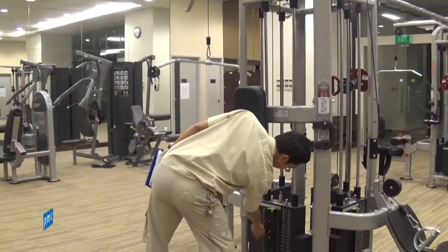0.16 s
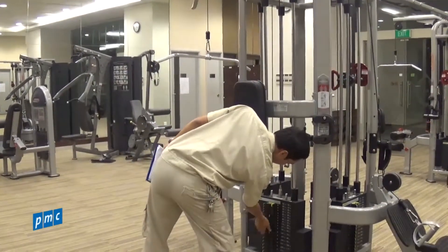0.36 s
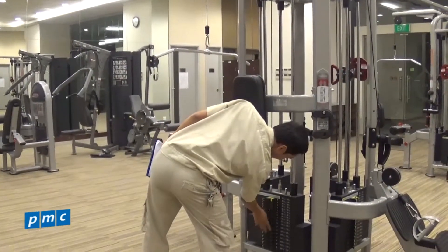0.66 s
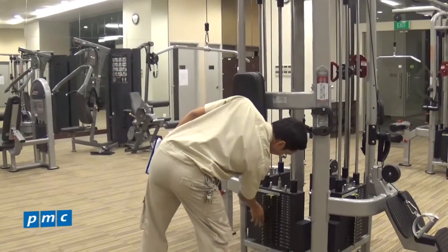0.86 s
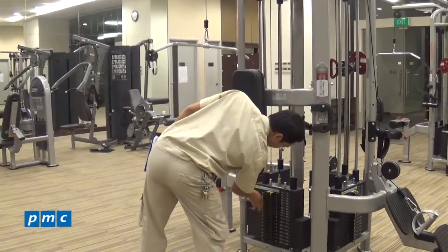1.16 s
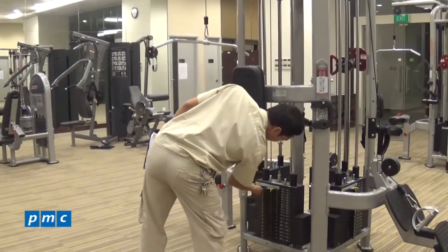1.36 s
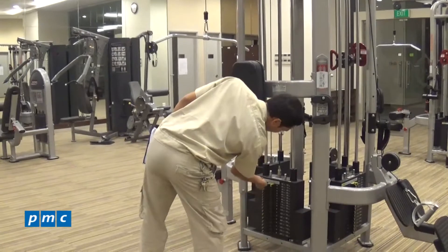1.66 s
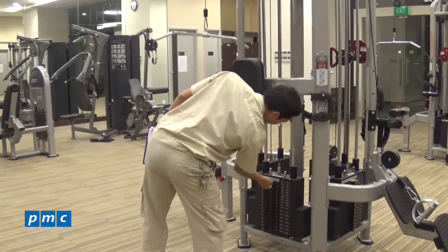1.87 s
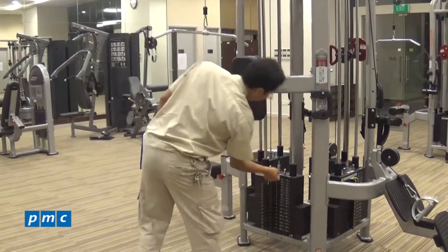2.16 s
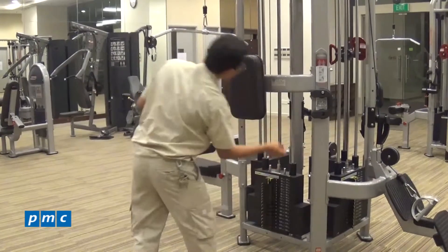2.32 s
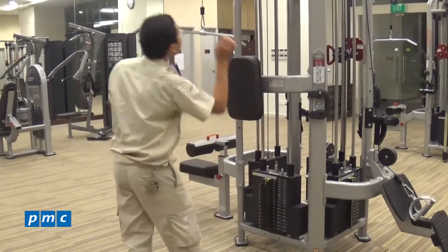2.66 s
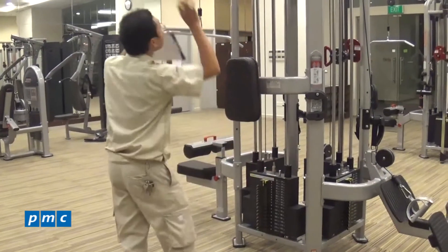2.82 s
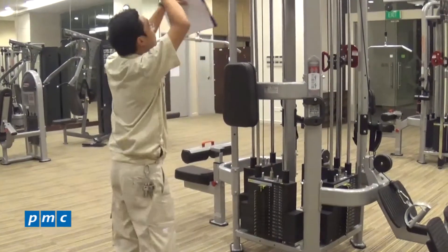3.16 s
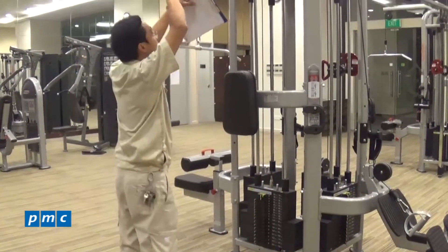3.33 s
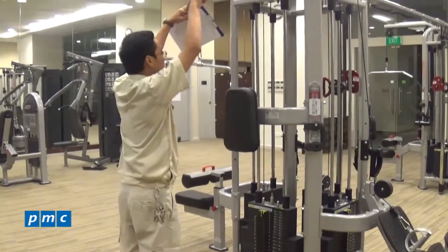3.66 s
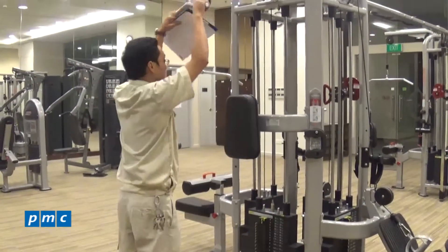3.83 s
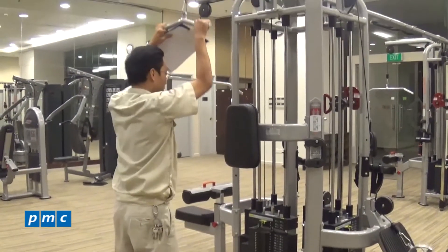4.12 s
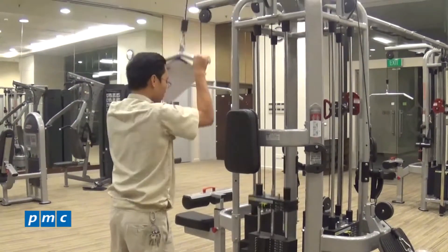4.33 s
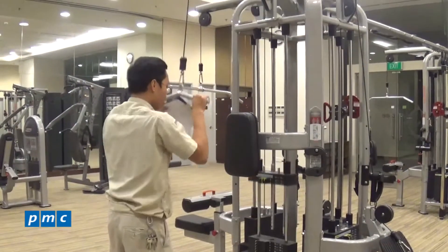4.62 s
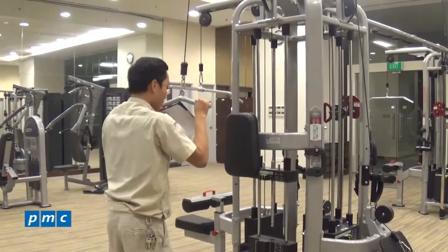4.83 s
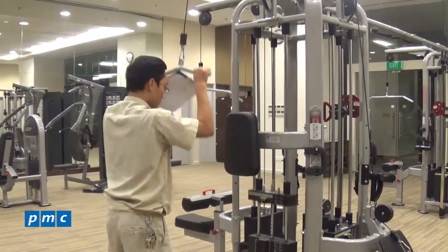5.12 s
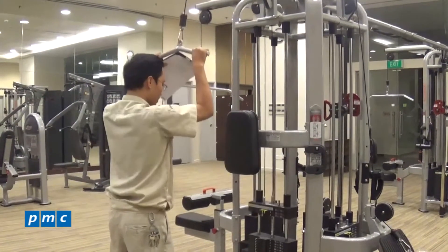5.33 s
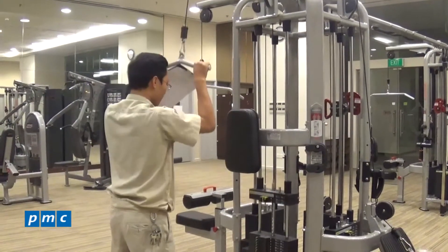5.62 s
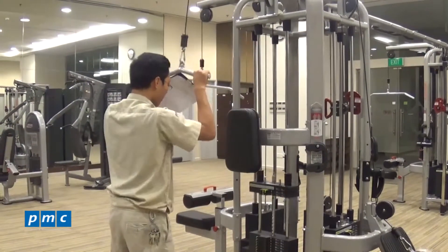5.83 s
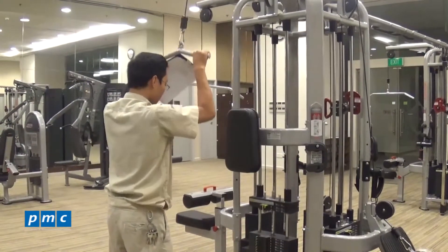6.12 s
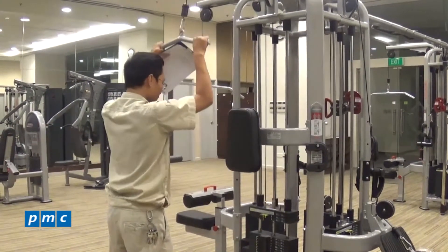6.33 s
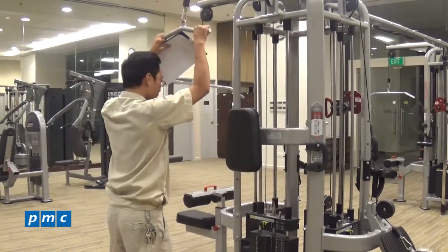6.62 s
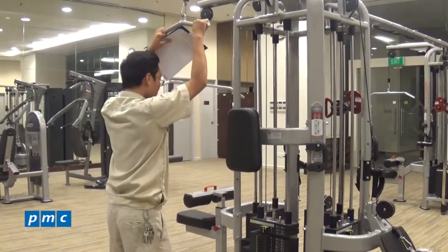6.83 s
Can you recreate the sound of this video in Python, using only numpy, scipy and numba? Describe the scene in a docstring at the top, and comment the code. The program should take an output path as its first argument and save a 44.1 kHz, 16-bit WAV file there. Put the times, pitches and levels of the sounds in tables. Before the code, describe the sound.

A steel pin is worked out of a gym weight stack and pushed back in, a few metres from the microphone. Sharp clanks with short, chattering rattles come at about 0.1, 0.5, 0.8 and 1.2 seconds, with a last firm cluster at 1.8, each echoing through a hard hall. Around 2.7 seconds a finger rubs briefly on the camera, followed by a few small, dry clicks right at the microphone until 3.4. At about 3.9 seconds the cable snatches the stack up: a quick metallic jolt, a bright ring from the stem and rods, and a soft, low frame rumble that fades by about 5 seconds. Ventilation and a faint mains hum fill the room throughout, sinking slightly after 3 seconds, along with a very faint, even ticking. A few tiny handling clicks occur between 5.8 and 6.6 seconds, before the end near 7.

```python
"""A steel selector pin is worked out of a gym weight stack and pushed home, a few metres from the
microphone of a hand-held camera. The plates clank and chatter into a hard, echoing hall; later the cable
snatches the stack up, its stem rings and the frame rumbles. Right at the microphone the camera rubs and
clicks under the fingers and ticks faintly. Ventilation and mains hum fill the room behind."""
import sys
import numpy as np
from scipy import signal
from scipy.fft import rfft, irfft, next_fast_len
from scipy.io import wavfile
from scipy.ndimage import uniform_filter1d, minimum_filter1d
from numba import njit

SR = 44100
rng = np.random.default_rng(int(sys.argv[2]) if len(sys.argv) > 2 else 0)


def wrap_up_sound(samples):
    """Save the sound to the file named by the first command line argument, as 16-bit audio."""
    columns = np.atleast_2d(samples).T
    # keep every value between -1 and 1, then stretch to whole-number steps
    tamed = np.clip(columns, -1, 1)
    steps = np.round(tamed * 32767).astype(np.int16)
    wavfile.write(sys.argv[1], SR, steps)


N = 307785
TIME = np.arange(N) / SR

# Moves of the pin; its seat in the hole favours one range of the plate's modes: (time [s], favoured
# pitch [Hz], width [octaves], lift [dB], tip ring [dB], relative chatter level [dB], swell [s],
# fade [s], tilt [dB/octave])
PIN_MOVES = [(0, 2100, 0.09, 10, 1.5, -27.5, 0.0033, .045, -3),
             (.138, 2056, 0.16, 17.5, -0.5, -8, 0.018, 0.09, 3),
             (.526, 2100, 0.11, 9.5, 2.5, -20, 0.033, 0.15, 1),
             (.844, 2710, 0.48, 6.5, 0.5, -3.5, 0.033, 0.066, 4),
             (1.2081, 1658, 0.54, 10, 2.5, -18, .015, 0.036, -3.5),
             (1.756, 1410, 0.45, 5, 9, -11.5, 0.027, 0.091, 1.5)]
# Pin on plate, brighter when it glances: (time [s], relative level [dB], tilt [dB/octave])
PIN_KNOCKS = [(.0394, -25.5, -5.5), (.075, -22.5, 1), (.1198, -16, 8.5), (.138, -4, 4), (.1506, -10.5, 9.5),
              (0.517, -17.5, -1), (.526, -4, 4.5), (.547, -6, 1.5), (.8, -22.5, 6.5), (0.83, -17.5, -0.5),
              (.8444, -4, 7), (.856, -13.5, 6), (1.167, -25, 8), (1.179, -7.5, 4.5), (1.192, -22, -1),
              (1.2081, -5.5, 3.5), (1.226, -16.5, 17), (1.6072, -26.5, 1), (1.7008, -34, 8),
              (1.7409, -21.5, 2.5), (1.7561, -3, 9.5), (1.764, -8.5, 4), (1.7689, -6.5, 6),
              (1.774, -7.5, -0.5), (1.787, -9.5, 7.5)]
# Modes of plate and pin: (frequency [Hz], relative level [dB], t60 [s])
PLATE_MODES = [(752, -11.5, 0.011), (1037, -22, 0.081), (1396, -9, .035), (1510, -17, 0.029),
               (1840, -20.5, 0.035), (1750, -14.5, 0.023), (1935, -8, 0.025), (2207, -3.5, 0.029),
               (2328, -3.5, .04), (2677, 1, 0.012), (2540, 7.5, 0.008), (2882, -3, 0.049), (3143, -4, 0.07),
               (3285, 2, 0.02), (3640, -1.5, 0.011), (3806, -4.5, 0.019), (4020, -4.5, 0.023),
               (4390, -2, 0.024), (4880, -8.5, .018), (5560, -6.5, 0.028), (6010, 1.5, 0.017),
               (6900, -2, 0.017), (7435, -3, 0.019), (8350, -5.5, 0.019), (8740, -2.5, 0.015),
               (9323, -8.5, 0.035), (9970, -2.5, 0.013)]
# Crack of pin on plate: (frequency [Hz], relative level [dB])
PLATE_CRACK = [(200, -13.5), (500, -15.5), (1100, 1.5), (2500, 8.5), (5000, 5), (9500, -4), (11000, -9)]
# The stem takes up the load: (time [s], relative level [dB])
STEM_JOLTS = [(3.865, -30), (3.878, -10.5), (3.8839, -12), (3.8918, -10.5), (3.9, -34)]
# Crack of stem on pin: (frequency [Hz], relative level [dB])
STEM_CRACK = [(200, -17.5), (500, -10), (700, -4.5), (900, -11), (1300, 3.5), (1600, -5), (1900, 7),
              (2400, -6), (3400, -2), (4200, 3), (4800, -14), (5800, -3.5), (6500, 9), (6950, -3.5),
              (8400, 6.5), (9300, -2.5), (9900, 8.5), (11000, -9.5)]
# Modes of stem and guide rods: (frequency [Hz], relative level [dB], t60 [s])
STEM_MODES = [(665, -15.5, 0.57), (1222, -17, 1), (1310, -4, 0.48), (1825, -15.5, 1), (1907, -1, 0.51),
              (2660, -15, 1), (2982, -10, 1), (3785, -8.5, 1), (4197, -7, 0.29), (6083, -19, 0.58),
              (6479, 11.5, 0.29), (7180, -14, .45), (7435, 2, 0.42), (7850, -13, 0.26), (8265, -4, .35),
              (8540, -9, 0.39), (9300, -2, .35), (10820, -11, 0.318)]
# Frame and pulleys as the stack rises: (frequency [Hz], relative level [dB])
FRAME_RUMBLE = [(15, -17), (27, 0), (60, -2), (140, -7), (200, 0.5), (350, -15.5), (700, -1), (1500, -4.5),
                (4000, -51)]
# First reflections off floor and frame: (delay [s], relative level [dB])
REFLECTIONS = [(.0035, -18.5), (0.0103, -17), (0.015, -21)]
# Decay of the hall: (frequency [Hz], t60 [s])
HALL_T60 = [(150, 4.4), (700, 1.4), (2000, 1.203), (4000, 1.11), (7000, 0.89), (11000, 0.55)]
# Colour of the hall's echo: (frequency [Hz], relative level [dB])
HALL_COLOUR = [(100, 3.5), (700, 10.5), (2500, 3), (5000, 4.5), (8000, 0.5), (11000, 0.5)]
# A finger slides on the camera body: (frequency [Hz], relative level [dB])
FINGER_RUB = [(600, -13), (1300, -3), (1900, 3.5), (3200, -7.5), (4400, -10), (6500, -8), (9500, -3.5),
              (11000, -9)]
# Casing clicks at the microphone: (time [s], relative level [dB], pitch [Hz], treble [dB])
CASING_CLICKS = [(2.7775, -30.5, 3550, -4.5), (3.0255, -38, 3100, -13), (3.203, -26.5, 3120, 3.5),
                 (3.427, -51, 8720, -2), (5.766, -50.5, 803, -42), (6.3025, -50.5, 3347, -6.5),
                 (6.5627, -51, 2600, -10.5)]
# Room tone of ventilation and hiss: (frequency [Hz], relative level [dB])
AIR_COLOUR = [(12, -52.5), (20, -21), (69, -18), (81, -7), (103, -8), (124, -12.5), (165, -16), (199, -10),
              (227, -17.5), (259, -15), (428, -17), (514, -17.5), (806, -18), (2030, -23), (11000, -30.5),
              (14300, -65), (22000, -120)]
# Stereo width of the room tone: (frequency [Hz], side minus mid [dB])
AIR_WIDTH = [(60, -19.5), (190, -8), (600, -0.5), (1100, 0.5), (3500, -3), (11000, -10)]
# Mains hum: (frequency [Hz], relative level [dB])
MAINS_HUM = [(100.3, -64), (200, -80.5)]
# The room tone sinks slowly: (time [s], gain [dB])
ROOM_TONE_GAIN = [(0, 6), (2.7, 6), (3.7, 2.8), (6.98, -0.2)]


def pin(bounces=54, mean_gap_s=.007, dulling_db_per_s=10.5, knock_lift_db=5):
    """The pin knocks and chatters along its hole, in uneven bounces that swell, then weaken and dull."""
    out = np.zeros(N)
    for start, hz, octaves, lift_db, tip_db, db, swell_s, fade_s, tilt_db in PIN_MOVES:
        delays = mean_gap_s * (np.arange(bounces) + rng.uniform(0, 1, bounces))
        force = (1 - np.exp(-(delays / swell_s) ** 2)) * np.exp(-delays / fade_s)
        for delay, gain in zip(delays, force * undb(db)):
            bounce = clank(hz, octaves, lift_db, tip_db, tilt_db - dulling_db_per_s * delay)
            add(out, start + delay, gain * bounce)
    for start, db, tilt_db in PIN_KNOCKS:
        # a square blow drives the nearest move's favoured modes harder than a bounce does
        _, hz, octaves, lift_db, tip_db, *_ = min(PIN_MOVES, key=lambda move: abs(move[0] - start))
        add(out, start, undb(db) * clank(hz, octaves, lift_db + knock_lift_db, tip_db, tilt_db))
    return thin(out)


def clank(seat_hz, octaves, lift_db, tip_db, tilt_db, detune=.017, vary_db=2, rise_s=.00027):
    """One steel contact: a crack and the plate's modes; the pin's seat decides which speak."""
    def favour_db(f):
        seat = lift_db * bump(f, seat_hz, octaves, steep=3.7)
        tip = tip_db * bump(f, hz=9350, octaves=.25)
        return seat + tip + tilt_db * np.log2(np.maximum(f, 500) / 3000)

    t = TIME[:3000]
    hz, db, t60 = np.transpose(PLATE_MODES)
    shift, luck = rng.standard_normal((2, len(hz)))
    modes = strike(ring(t, hz * (1 + detune * shift), db + favour_db(hz) + vary_db * luck, t60))
    crack = burst(lambda f: at(f, PLATE_CRACK) + favour_db(f), t60=.023)
    return strike((modes + crack) * (1 - np.exp(-t / rise_s)))


def jolts():
    """The stem jolts against the pin a few times as the cable tightens."""
    out = np.zeros(N)
    for start, db in STEM_JOLTS:
        add(out, start, undb(db) * burst(lambda f: at(f, STEM_CRACK), t60=.081, size=5000))
    return out


def stem(twin_db=-7, split_hz=(3.43, 18.9)):
    """The hardest jolt rings stem and rods; each bends two ways at nearly one pitch, so tones beat."""
    out, t = np.zeros((2, N)), TIME[:50000]
    hz, db, t60 = np.transpose(STEM_MODES)
    tones = ring(t, hz, db, t60)
    twins = [ring(t, hz + rng.uniform(*split_hz, len(hz)), db + twin_db, t60) for _ in range(2)]
    start, _ = max(STEM_JOLTS, key=lambda jolt: jolt[1])
    add(out, start, tones + np.array(twins))
    return out


def friction(colour, start, rise_s, hold_s, t60, db, side_db):
    """Sliding surfaces make noise of one colour that swells, holds and fades."""
    t = TIME - start
    envelope = np.clip(t / rise_s, 0, 1) * fade(np.maximum(t - rise_s - hold_s, 0), t60)
    mid, side = (unit(noise(N, lambda f: at(f, colour))) for _ in range(2))
    return stereo(mid, undb(side_db) * side) * undb(db) * envelope


def direct_path(x):
    """The straight path from stack to microphone, with the first reflections."""
    out = pan(db=-.7) * x
    for delay, db in REFLECTIONS:
        add(out, delay, undb(db) * x)
    return out


def hall(x, build_s=.0036, side_db=-7, size=65536):
    """The hard walls return a diffuse echo that builds up, then dies fastest in the treble."""
    t, f = TIME[:size], np.arange(size // 2 + 1) * SR / size
    centres = np.geomspace(100, 12000, 15)
    spectra = rfft(rng.standard_normal((2, size))) * undb(at(f, HALL_COLOUR))
    tail = 0
    for hz, share in zip(centres, np.eye(len(centres))):
        band = irfft(spectra * at(f, np.column_stack([centres, share])), size)
        tail = tail + band * fade(t, at(hz, HALL_T60))
    mid, side = tail * (1 - np.exp(-(t / build_s) ** 2))
    response = stereo(mid, undb(side_db) * side) / np.linalg.norm(mid)
    return signal.fftconvolve(x[None], response, axes=1)[:, :N]


def shifting_hall(x):
    """The man shifts beside the stack with each move, so each meets its own pattern of reflections."""
    times = [move[0] for move in PIN_MOVES]
    return sum(hall(x * np.sqrt(np.interp(TIME, times, share))) for share in np.eye(len(times)))


def camera_clicks(side_db=-9):
    """The casing clicks under the fingers, dry and right at the microphone."""
    out = np.zeros((2, N))
    for start, db, hz, treble_db in CASING_CLICKS:
        def casing_db(f):
            edge = bump(f, 8750, .25) + .5 * bump(f, 1200, .2)
            return 20 * np.log10(bump(f, hz, octaves=.57) + undb(treble_db) * edge + 1e-4)

        mid, side = (burst(casing_db, t60=.018) for _ in range(2))
        add(out, start, undb(db) * pan(db=-1) * thin(stereo(mid, undb(side_db) * side)))
    return out


def camera_ticks(per_second=12.47, db=-60):
    """The camera's works tick faintly and evenly, close and dead centre."""
    out = np.zeros(N)
    for start in np.arange(.06, TIME[-1], 1 / per_second):
        add(out, start, undb(db) * burst(lambda f: 40 * bump(f, hz=2600, octaves=.34), t60=.035))
    return out


def room_tone(air_db=-59, waver=.076):
    """Ventilation all round the microphone, widest in the middle range, and a wavering mains hum."""
    mid = noise(N, lambda f: at(f, AIR_COLOUR) - 9 * bump(f, hz=100, octaves=.2))
    side = noise(N, lambda f: at(f, AIR_COLOUR) + at(f, AIR_WIDTH))
    air = undb(air_db) * stereo(mid, side) / mid.std()
    drift = unit(noise(N, lambda f: -40 * np.log10(1 + (f / 3) ** 2)))
    hum = sum(undb(db) * np.sqrt(2) * np.sin(2 * np.pi * hz * TIME) for hz, db in MAINS_HUM)
    return (air + hum * (1 + waver * drift)) * undb(np.interp(TIME, *np.transpose(ROOM_TONE_GAIN)))


def undb(db):
    """Decibels to gain."""
    return 10 ** (np.asarray(db) / 20)


def unit(x):
    """Scale to rms 1."""
    return x / np.sqrt(np.mean(x ** 2))


def strike(x):
    """Scale a blow to rms 1 over its first 5 ms."""
    return x / np.sqrt(np.mean(x[:220] ** 2))


def at(hz, points):
    """Read a table on a log-frequency axis."""
    f, values = np.transpose(points)
    return np.interp(np.log(np.maximum(hz, 1)), np.log(f), values)


def bump(f, hz, octaves, steep=2):
    """A bell on the log-frequency axis, 1 at its centre; a higher steepness flattens its top."""
    return np.exp(-.5 * np.abs(np.log2(np.maximum(f, 1) / hz) / octaves) ** steep)


def noise(size, colour):
    """White noise filtered by colour(Hz) -> dB."""
    length = next_fast_len(size)
    spectrum = rfft(rng.standard_normal(length))
    return irfft(spectrum * undb(colour(np.arange(len(spectrum)) * SR / length)), length)[:size]


def fade(t, t60):
    """Exponential decay, 60 dB down after t60."""
    return np.exp(-np.log(1000) * t / t60)


def burst(colour, t60, size=3000):
    """The crack of a contact: coloured noise that dies away."""
    return strike(noise(size, colour) * fade(TIME[:size], t60))


def ring(t, hz, db, t60):
    """Sum of decaying modes, each at its own phase."""
    phase = rng.uniform(0, 2 * np.pi, (len(hz), 1))
    return undb(db) @ (np.sin(2 * np.pi * hz[:, None] * t + phase) * fade(t, t60[:, None]))


def thin(x, cut_hz=490):
    """Small parts radiate little bass."""
    return signal.sosfilt(signal.butter(2, cut_hz, "high", fs=SR, output="sos"), x)


def add(out, start, x):
    """Mix x into out from start, in seconds."""
    i = max(int(start * SR), 0)
    out[..., i:i + x.shape[-1]] += x[..., :N - i]


def pan(db):
    """Channel gains for left minus right in dB."""
    return undb(np.array([[db], [-db]]) / 2)


def stereo(mid, side):
    """Mid and side to left and right."""
    return np.array([mid + side, mid - side])


@njit
def follow(x, attack, release):
    """Envelope that rises quickly and sinks slowly."""
    out, level = np.empty(len(x)), 0.
    for i in range(len(x)):
        level += (x[i] - level) * (attack if x[i] > level else release)
        out[i] = level
    return out


def scene():
    """From the camera position: the steel sounds through the hall; friction and camera stay dry."""
    clanks, snatch, rods = undb(-6) * pin(), undb(-5) * jolts(), undb(-31) * stem()
    into_hall = undb(1) * clanks + undb(-8) * (snatch + rods.mean(axis=0))
    machine = direct_path(clanks + snatch) + rods + shifting_hall(into_hall)
    rumble = friction(FRAME_RUMBLE, start=3.88, rise_s=.1, hold_s=.12, t60=1.74, db=-43.5, side_db=-24)
    finger = friction(FINGER_RUB, start=2.665, rise_s=.04, hold_s=.065, t60=.34, db=-45.5, side_db=-11)
    return machine + rumble + finger + camera_clicks() + camera_ticks() + room_tone()


def record(dry, limit_db=-7, attack_s=.00066, release_s=.1, ceiling=.8, top_hz=11150):
    """The camera's limiter ducks the loudest clanks and lets the echo swell back; the top is cut."""
    envelope = follow(np.abs(dry).max(axis=0), 1 / (1 + attack_s * SR), 1 / (1 + release_s * SR))
    gain = np.minimum(1, undb(limit_db) / (envelope + 1e-9))
    gain = uniform_filter1d(minimum_filter1d(gain, 24), 24)  # looks half a millisecond ahead
    limited = np.clip(dry * gain, -ceiling, ceiling)
    return signal.sosfilt(signal.ellip(10, .2, 60, top_hz, fs=SR, output="sos"), limited)


dry = scene()
out = record(dry)
wrap_up_sound(out)
```